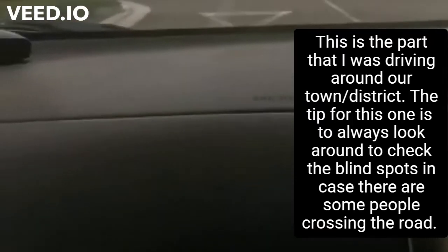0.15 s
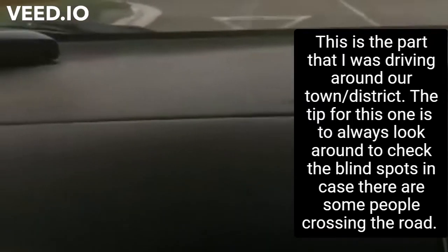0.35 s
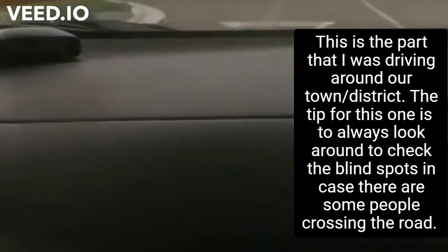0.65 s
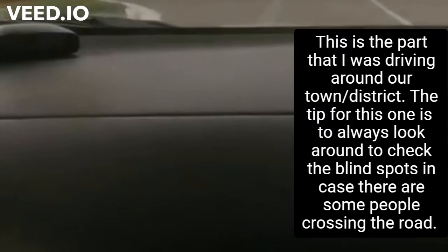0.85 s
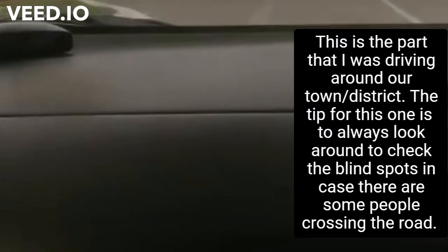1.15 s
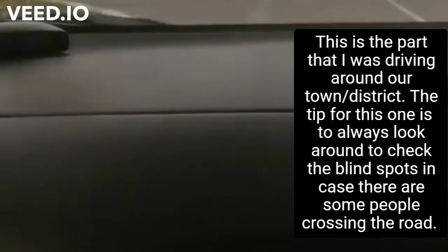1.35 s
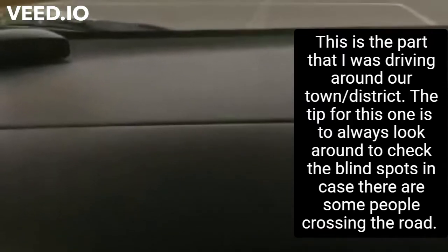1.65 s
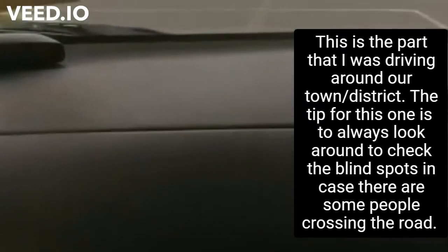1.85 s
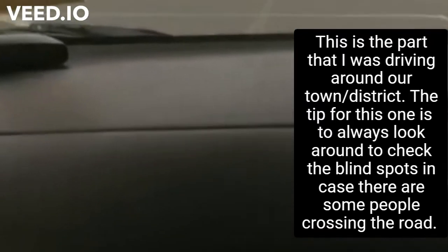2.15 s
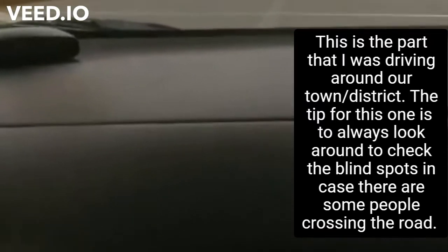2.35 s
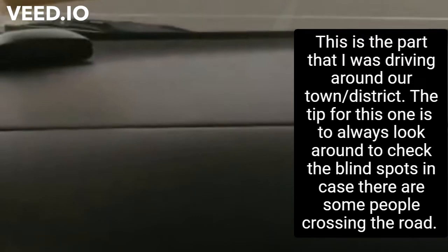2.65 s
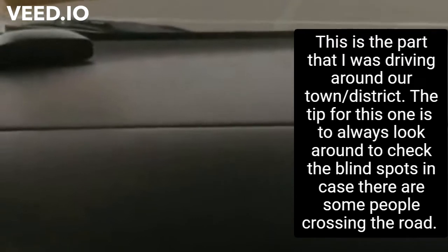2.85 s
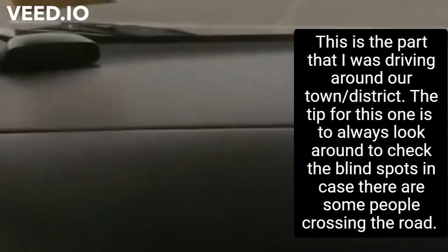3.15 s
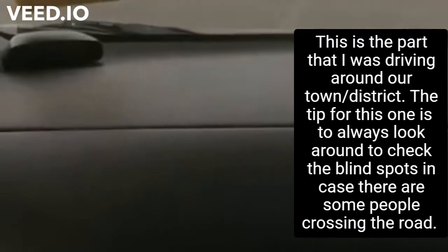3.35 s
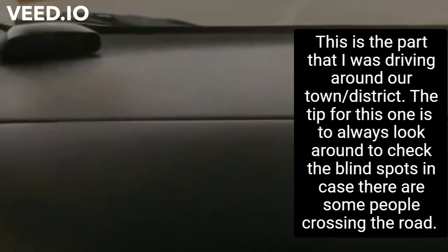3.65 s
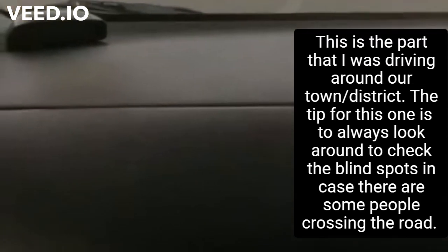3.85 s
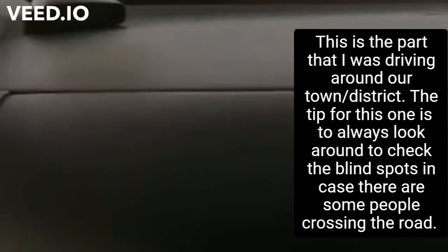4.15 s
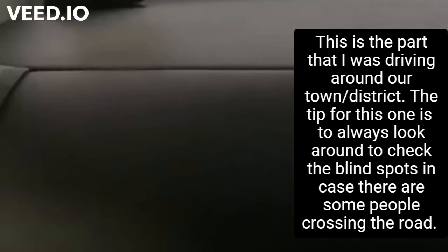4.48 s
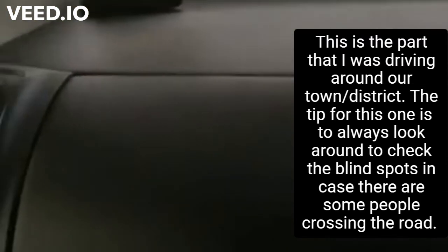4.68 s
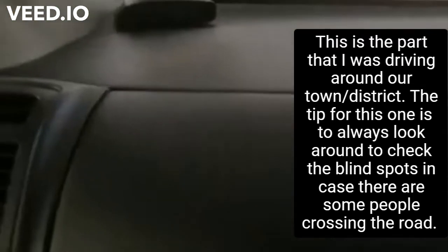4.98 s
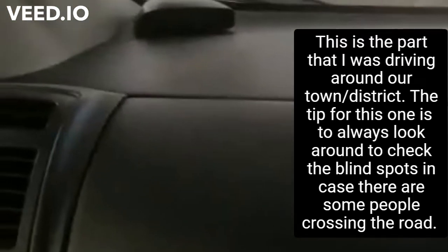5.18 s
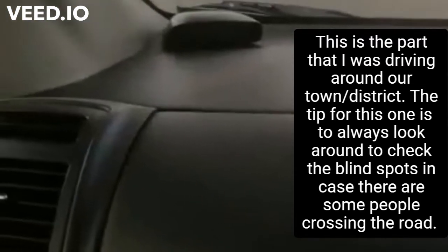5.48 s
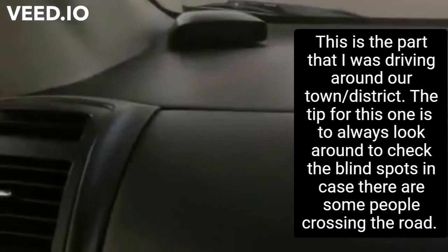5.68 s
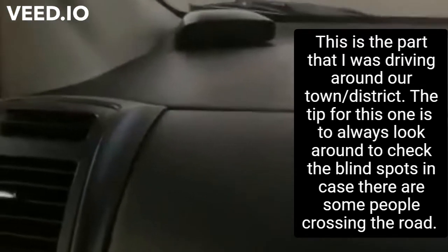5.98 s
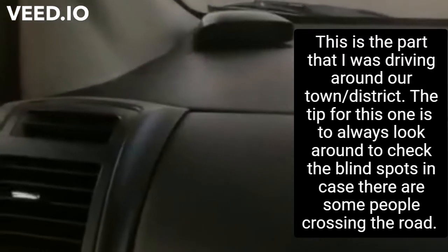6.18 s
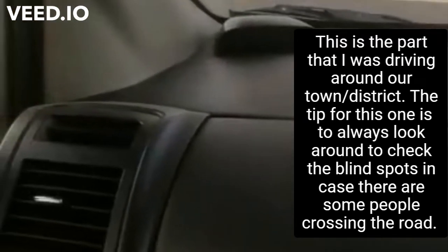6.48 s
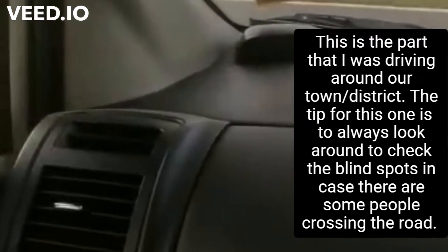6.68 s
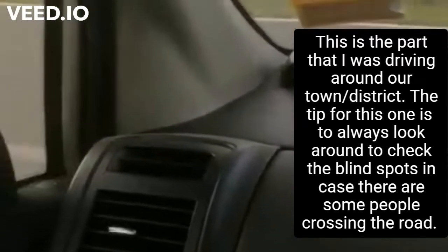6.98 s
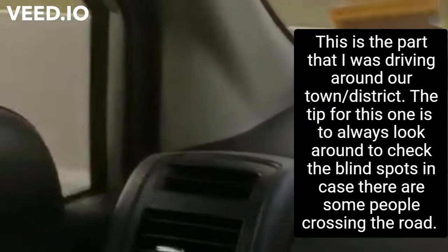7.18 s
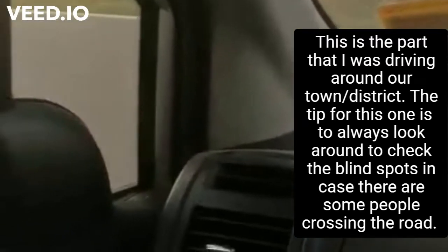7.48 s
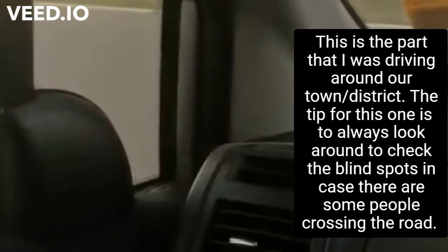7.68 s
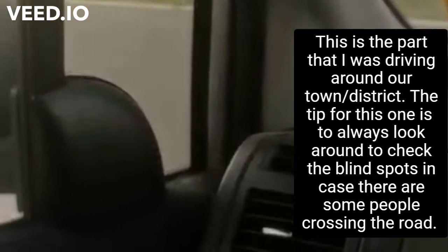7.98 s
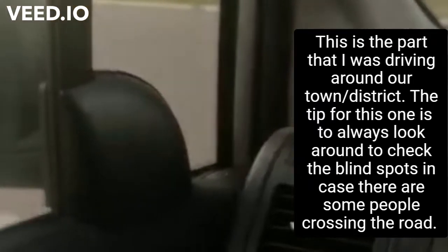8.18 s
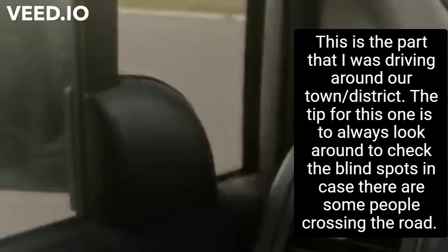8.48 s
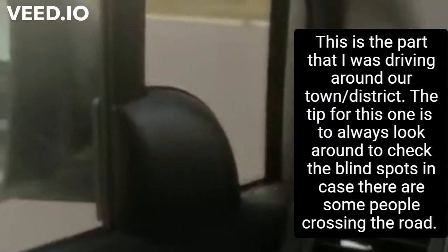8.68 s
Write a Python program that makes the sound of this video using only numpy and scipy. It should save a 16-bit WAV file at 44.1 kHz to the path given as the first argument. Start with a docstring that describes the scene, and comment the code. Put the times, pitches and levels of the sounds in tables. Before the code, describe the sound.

Close, padded car cabin heard through a handheld phone with dull treble. Bass-heavy bumps and shudders roll over low engine drone and soft road roar, stronger at first and then calmer. Small dry indicator ticks repeat almost three times a second, leaning right. Gritty skin rubbing, tiny case clicks and brief thin squeaks come and go; a double heavy thump precedes one bright plastic clack.

```python
"""Inside a small car rolling slowly round a corner: body boom, tyre roar and a low engine.
Shaped noise makes the ride; sine waves make the engine and the ticking turn signal.
Bumps thud through the cabin as ringing low tones; near the end a plastic lever snaps over.
A hand shifts on the phone: skin rubs by the right microphone as gritty noise,
and the case clicks (noise bursts) and squeaks (whistles mixed with noise)."""
import sys
import numpy as np
from scipy import signal
from scipy.fft import rfft, irfft, next_fast_len
from scipy.io import wavfile
from scipy.ndimage import uniform_filter1d, map_coordinates

SR = 44100
rng = np.random.default_rng(int(sys.argv[2]) if len(sys.argv) > 2 else 0)


def inscribe(sig):
    """Save sig as 16-bit PCM at rate SR to the path in sys.argv[1].

    A 1-D sig is mono; a 2-D sig holds one channel per row.
    Samples are clipped to [-1, 1] before scaling.
    """
    pcm = np.round(np.clip(np.atleast_2d(sig).T, -1, 1) * 32767)
    wavfile.write(sys.argv[1], SR, pcm.astype(np.int16))


N = 389403  # length [samples]
HISS_TOP_HZ = 7550  # most of the noises stop here

# how the cabin's noise leans to one side: (frequency [Hz], left over right [dB])
SIDE_LEAN = [(60, 5.9), (150, 5), (280, .5), (600, 0), (2000, -2), (7000, -1)]
# colour of the tyre roar, also of trim shaken by thuds: (frequency [Hz], relative level [dB])
ROAR_COLOUR = [(120, -19), (220, 6), (300, -1.5), (480, -1.5), (700, -13), (1100, -13), (1700, -23),
               (3000, -32.5), (7500, -38)]
# colour of the clicking phone case, also of the lever's chatter: (frequency [Hz], relative level [dB])
CASE_COLOUR = [(200, -16), (700, 4), (1400, 9), (2200, 10), (3400, 0.5), (5000, -2), (8000, -8)]


def amp(db):
    """Turn decibels into a gain."""
    return 10 ** (np.asarray(db) / 20)


def unit(x):
    """Scale a sound to an rms (average strength) of 1."""
    return x / np.sqrt(np.mean(x ** 2) + 1e-20)


def along(points, hz):
    """Read a curve of (frequency, value) points, spacing pitch as the ear does (log axis)."""
    f, v = np.transpose(points)
    return np.interp(np.log(hz + 1), np.log(f + 1), v)


def curves(rows):
    """Give one value per sample for each column after the time."""
    s, *columns = np.transpose(rows)
    return [np.interp(np.arange(N) / SR, s, column) for column in columns]


def wobble(rate):
    """Draw a smooth random curve with this many random points a second."""
    points = rng.standard_normal(int(N * rate / SR) + 4)
    return map_coordinates(points, [np.arange(N) * rate / SR])


def filtered(x, response):
    """Multiply the spectrum of x by a response that depends on frequency."""
    n = x.shape[-1]
    m = next_fast_len(n + SR // 4)
    spectrum = rfft(x, m) * response(np.fft.rfftfreq(m, 1 / SR))
    return irfft(spectrum, m)[..., :n]


def pan(db):
    """Left and right gains; positive decibels make the left louder."""
    return amp(np.array([db, -db]).reshape(2, -1) / 2)


def add(track, s, sound):
    """Mix a sound into the track at time s [s]."""
    part = track[:, round(s * SR):][:, :sound.shape[-1]]
    part += sound[..., :part.shape[-1]]


def patchy(x, depth_db):
    """Make a sound uneven with random gains in small patches of time and pitch."""
    z = signal.stft(x, nperseg=2048)[2]
    over_pitch = uniform_filter1d(rng.standard_normal(z.shape[1:]), size=5, axis=0)
    field = uniform_filter1d(over_pitch, size=4, axis=1)
    return signal.istft(z * amp(depth_db * unit(field)), nperseg=2048)[1][:, :N]


def swell(s, length, attack, release):
    """Rise from time s, hold until the length is over, then die away (all in seconds)."""
    t = np.arange(N) / SR - s
    return np.clip(t / attack, 0, 1) * np.exp(-np.maximum(t - length, 0) / release)


def cabin_noise(colour):
    """Noise whose bass both microphones share and whose treble they do not; its mid has rms 1."""
    # how alike left and right are: (frequency [Hz], likeness [0 unrelated to 1 the same])
    likeness = [(60, .96), (120, .94), (240, .88), (480, .7), (1000, .3), (2000, 0)]

    def mid_and_side(hz):
        angle = np.arccos(np.clip(along(likeness, hz), -1, 1)) / 2
        return amp(along(colour, hz)) * (hz < HISS_TOP_HZ) * [np.cos(angle), np.sin(angle)]

    mid, side = filtered(rng.standard_normal((2, N)), mid_and_side)
    pair = filtered(np.array([mid + side, mid - side]), lambda hz: pan(along(SIDE_LEAN, hz)))
    return pair / pair.mean(0).std()


def steadied(x, span):
    """Even out a noise's own slow swells, judged over a span [s]."""
    energy = np.abs(uniform_filter1d(x.mean(0) ** 2, int(span * SR)))
    return x / np.sqrt(energy + 1e-6)


def ride(smooth_db, bumps):
    """Strength of a body vibration: a wandering base, to which each bump adds its energy."""
    base = amp(smooth_db + 3 * wobble(8.5))
    energy = base ** 2
    for s, length, db in bumps:
        energy = energy + (amp(db) * swell(s, length, attack=.03, release=.043)) ** 2
    return np.sqrt(energy)


def road():
    """The body booms on its springs, the floor shudders, the tyres drum, the tarmac roars, air hisses."""
    # the tyres on the changing tarmac: (time [s], drum level [dB], roar level [dB])
    tyre_levels = [(0, -46.5, -59.5), (.9, -48, -60.5), (1.45, -49, -58.5), (2.3, -45, -59.5),
                   (3.0, -54, -62.5), (5.2, -54, -64), (6.6, -54, -64), (7.6, -51.5, -62),
                   (8.8, -52, -60.5)]
    # uneven patches that rock the body and shake the floor:
    # (time [s], length [s], boom level [dB], shudder level [dB])
    uneven_patches = [(-.05, 0.052, -20.5, -32), (0.268, 0.3, -30.5, -38.5), (0.592, 0.15, -30, -51),
                      (0.991, 0.12, -33, -55), (1.218, .08, -32.5, -49), (1.387, 0.13, -28, -39.5),
                      (1.86, 0.24, -32.5, -41), (2.086, 0.084, -22.5, -27), (2.212, 0.17, -26.5, -35.5),
                      (2.452, 0.13, -27.5, -29), (2.76, 0.097, -29.5, -43), (2.964, 0.14, -42.5, -40.5),
                      (3.336, 0.089, -29.5, -47), (3.679, .13, -24, -34.5), (4.33, .06, -30, -41),
                      (4.472, 0.039, -33, -35), (4.673, 0.24, -44, -40.5), (5.122, 0.19, -37.5, -40),
                      (5.389, 0.1, -26.5, -37), (5.54, 0.27, -28.5, -37.5), (5.866, .26, -26.5, -38),
                      (6.61, 0.13, -32.5, -34), (6.795, .1, -31.5, -39), (7.005, 0.058, -30, -32.5),
                      (7.141, .18, -33.5, -43), (7.599, 0.067, -22.5, -39), (7.77, 0.15, -34.5, -47.5),
                      (8.569, 0.66, -25.5, -55)]
    # colours of the body boom, floor shudder, tyre drumming and air: (frequency [Hz], relative level [dB])
    boom_colour = [(8, -26.5), (15, -13), (22, 18), (28, 20), (35, 22), (44, -17.5), (60, -67)]
    shudder_colour = [(30, -28.5), (43, -1), (52, 24), (62, -4.5), (74, 7.5), (90, -1), (125, -61.5)]
    drum_colour = [(60, -34), (92, 5), (115, -1), (170, -5), (210, -19), (300, -31), (600, -65)]
    air_colour = [(500, -12), (1100, -2.5), (1400, -6.5), (2300, 5), (2900, -3.5), (3500, -6.5), (5000, -6),
                  (7500, -14)]

    s, length, boom_db, shudder_db = np.transpose(uneven_patches)
    boom = ride(-37.5, zip(s, length, boom_db)) * steadied(cabin_noise(boom_colour), span=.049)
    shudder = ride(-45.5, zip(s, length, shudder_db)) * steadied(cabin_noise(shudder_colour), span=.11)

    drum_db, roar_db = curves(tyre_levels)
    surge_db = 2.25 * wobble(8.6)  # the drumming swells and sinks
    drum = amp(drum_db + surge_db) * cabin_noise(drum_colour)
    roar = patchy(cabin_noise(ROAR_COLOUR), depth_db=2.5)
    air = amp(-12.5) * patchy(cabin_noise(air_colour), depth_db=2)
    return boom + shudder + drum + amp(roar_db) * (roar + air)


def engine():
    """Low multiples of the firing rate, each a little unsteady; the revs sag in the corner and recover."""
    # (time [s], firing rate [Hz])
    firing_rates = [(0, 30.4), (1.25, 29.1), (2, 27.5), (6.9, 27.6), (7.25, 22.9), (8.3, 28.1),
                    (8.83, 29.1)]
    # (multiple of the firing rate, relative level [dB])
    orders = [(1, -1.5), (2, 5), (3, 1), (4, 1), (5, -9.5), (6, -13)]

    firing_hz, = curves(firing_rates)
    phase = 2 * np.pi * np.cumsum(firing_hz) / SR
    hum = np.zeros(N)
    for multiple, db in orders:
        strength = amp(db + 2.5 * wobble(2.0))
        hum += strength * np.sin(round(multiple) * phase + rng.uniform(0, 2 * np.pi))
    return amp(-56.5) * hum * pan(along(SIDE_LEAN, firing_hz))


def thuds():
    """Soft, heavy blows ring the cabin's low tones and briefly shake the trim."""
    # (time [s], level [dB], time to fade by 60 dB [s])
    blows = [(0.413, -19.5, 0.093), (0.481, -35.5, 0.25), (1.763, -35.5, 0.24), (2.257, -34.5, 0.092),
             (3.668, -32, 0.12), (3.711, -38.5, 0.16), (6.96, -34.5, 0.19), (6.995, -19, 0.13),
             (7.0112, -19, .13), (7.0182, -17.5, 0.15), (7.056, -33, 0.19), (7.1, -29, 0.18),
             (7.64, -41, 0.15)]
    # what the cabin booms with when struck: (frequency [Hz], relative level [dB])
    boom_tones = [(112, 0), (132, 1), (152, 0), (174, -5), (212, -15.5)]

    out, t = np.zeros((2, N)), np.arange(SR // 2) / SR
    onset = (1 - np.exp(-t / .0058)) ** 2
    for s, db, t60 in blows:
        ring = sum(amp(level + rng.normal(0, 1.2)) * np.sin(2 * np.pi * hz * t) for hz, level in boom_tones)
        noise = rng.standard_normal((2, len(t)))
        rattle = filtered(noise, lambda hz: amp(along(ROAR_COLOUR, hz)) * (hz < HISS_TOP_HZ))
        trim = amp(-21.5) * unit(rattle)
        add(out, s, amp(db) * (ring + trim) * onset * amp(-60 * t / t60))
    return out * pan(db=4.5)


def indicator():
    """Each tick is a rounded burst of a few milliseconds, echoed by windscreen and doors."""
    # the dashboard as the phone turns: (time [s], tick level [dB], left over right [dB])
    dashboard = [(0, -46.5, -11), (2.3, -47, -5), (2.97, -44, -5), (3.8, -47.5, -8.5), (4.5, -45.5, -10),
                 (5.1, -47, -3), (5.8, -48, -5), (6.45, -50, -6), (7.5, -49.5, -2), (8.6, -48, -4)]
    # the tones in one tick: (frequency [Hz], relative level [dB])
    tick_tones = [(2485, 0), (2400, -7), (2280, -12), (2660, -18), (2020, -16), (2980, -22), (4950, -30),
                  (5700, -28), (5950, -21)]
    # echoes: (delay [s], relative level [dB])
    wall_echoes = [(.0077, -8), (.0138, -12), (.0195, -18)]
    first_s, period_s = .1668, .35
    crest_s = .0043  # time from the start of a tick to its peak

    out, t = np.zeros((2, N)), np.arange(SR // 20) / SR
    shape = (t / crest_s * np.exp(1 - t / crest_s)) ** 3
    when, levels_db, leans_db = np.transpose(dashboard)
    for s in np.arange(first_s, N / SR, period_s):
        db, lean_db = np.interp(s, when, levels_db), np.interp(s, when, leans_db)
        # the direct path comes first, then the echoes
        for delay, path_db in [(.000068, .0014), *wall_echoes]:
            # longer paths vary more in phase [cycles]
            phases = rng.normal(0, .08 + 9 * delay, (len(tick_tones), 2, 1))
            burst = np.zeros((2, len(t)))
            for (hz, level), phase in zip(tick_tones, phases):
                strength = amp(level + rng.normal(0, 1.5))
                burst += strength * np.sin(2 * np.pi * (hz * (t + delay) + phase))
            add(out, s + delay, amp(db + path_db) * pan(lean_db) * shape * burst)
    return out


def lever():
    """A few contacts in quick succession, each a crack that rings its own part of the plastic."""
    # the lever slips over its catch: (time [s], level [dB], pitch of the contact [Hz])
    contacts = [(8.3195, -35, 1400), (8.3223, -21.5, 5100), (8.3232, -27, 2630), (8.3252, -19, 3470),
                (8.3265, -23, 1910), (8.3275, -39, 7000), (8.331, -41, 4600)]
    # how the plastic rings: (frequency [Hz], relative level [dB], time to fade by 60 dB [s])
    plastic_tones = [(1190, -10, .035), (1490, -13, .03), (1820, -9, .035), (1925, -7, .045),
                     (2040, -5, .05), (2180, -6, .05), (2490, 0, .026), (3250, -13, .025), (3480, -2, .021),
                     (3950, -12, .018), (4550, -13, .025), (5200, -2, .014), (6860, -9, .014)]

    out, t = np.zeros((2, N)), np.arange(SR // 6) / SR
    apart = np.array([[0], [.25]])  # cycles between the microphones
    for s, db, pitch_hz in contacts:
        def focus_db(hz):
            # tones are driven less, per octave away from the contact's own pitch
            return -9.5 * np.abs(np.log2((hz + 1) / pitch_hz))

        ring = np.zeros((2, len(t)))
        for hz, level, t60 in plastic_tones:
            strength = amp(level + focus_db(hz) - 60 * t / t60)
            ring += strength * np.sin(2 * np.pi * (hz * t + rng.random() + apart))
        crack = unit(filtered(rng.standard_normal((2, len(t))), lambda hz: amp(focus_db(hz))))
        crack = amp(-14.5 - 60 * t / .036) * crack
        # the loose parts chatter on after the blow
        noise = rng.standard_normal((2, len(t)))
        chatter = unit(filtered(noise, lambda hz: amp(along(CASE_COLOUR, hz)) * (hz < HISS_TOP_HZ)))
        chatter = amp(-15 - 60 * t / .11) * chatter
        add(out, s, amp(db) * (ring + crack + chatter) * (1 - np.exp(-t / .00059)))
    # take away the bass
    return filtered(out, lambda hz: 1 - 1 / (1 + (hz / 1060) ** 12)) * pan(db=-4.5)


def clicks():
    """Dry ticks and short scuffs of the phone case: bursts of noise that die away."""
    # (time [s], level [dB], time to fade by 60 dB [s], left over right [dB], treble tilt [dB per octave])
    case_clicks = [(0.41, -57, 0.08, -24, -1), (1.625, -47, 0.014, -21.5, 0), (3.097, -42, 0.014, -19, 1.5),
                   (6.329, -57, 0.066, -15, -5), (6.412, -57.5, 0.017, -10, 3),
                   (7.0115, -41.5, 0.077, -4.5, 2.5)]

    out, t = np.zeros((2, N)), np.arange(SR // 6) / SR
    for s, db, t60, lean_db, tilt_db in case_clicks:
        def colour(hz):
            return amp(along(CASE_COLOUR, hz) + tilt_db * np.log2((hz + 200) / 2500))

        crack = unit(filtered(rng.standard_normal((2, len(t))), colour))
        add(out, s, amp(db) * pan(lean_db) * crack * amp(-60 * t / t60))
    return out


def squeaks():
    """A finger sticks and slips on the case: a brief whistle, from thin and clean to ragged."""
    # (time [s], length [s], pitch [Hz], glide of the tone [Hz], width of the scrape [Hz],
    #  roughness [0 clean, 1 or more fully ragged], level [dB], left over right [dB])
    finger_slips = [(0.646, 0.054, 4230, 76, 201, 0.2, -62, 9), (0.687, 0.034, 4900, 298, 1210, 1, -65, -1),
                    (1.026, 0.048, 7120, 0, 600, 0.94, -45, -7.5),
                    (1.033, 0.031, 5130, 0, 1500, 1.1, -53.5, -4),
                    (1.096, 0.043, 4190, -100, 800, 0.97, -56.5, -3),
                    (4.559, 0.044, 5100, 0, 1800, 1.1, -64, -4), (.394, .03, 5050, 0, 900, 1.1, -60.5, -4),
                    (6.954, 0.053, 4740, 0, 700, 1.2, -56.5, -6),
                    (7.009, .014, 4860, 0, 403, .35, -47.5, -2)]

    out = np.zeros((2, N))
    for s, length, centre_hz, glide_hz, width_hz, rough, db, lean_db in finger_slips:
        n, rough = int(length * SR), np.clip(rough, 0, 1)
        tone_hz = centre_hz + glide_hz * np.linspace(-.5, .5, n)
        tone = np.sin(2 * np.pi * np.cumsum(tone_hz) / SR)
        noise = rng.standard_normal((2, SR // 8))
        scrape = filtered(noise, lambda hz: 1 / (1 + (2 * (hz - centre_hz) / width_hz) ** 2))[:, :n]
        slips = amp(1.8 * rough * wobble(350)[:n])
        whistle = unit(slips * (np.sqrt(1 - rough) * unit(tone) + np.sqrt(rough) * unit(scrape)))
        add(out, s, amp(db) * pan(lean_db) * signal.windows.tukey(n, .6) * whistle)
    return out


def rubbing():
    """Skin slides by the right microphone in strokes: fine, slightly gritty friction noise."""
    # strokes of the hand: (time [s], length [s], level [dB])
    strokes = [(-.04, 0.048, -52.5), (0.191, 0.28, -66), (0.293, .11, -65.5), (0.6, .1, -67.5),
               (0.952, 0.22, -71.5), (1.299, 0.1, -62), (1.462, .064, -64.5), (1.62, 0.1, -71.5),
               (1.932, 0.22, -63), (2.272, 0.21, -63.5), (2.68, 0.22, -77), (2.935, 0.26, -60.5),
               (4.24, .16, -69), (4.473, 0.14, -66), (4.604, 0.2, -70), (4.958, .39, -71.5),
               (5.506, 0.4, -64), (6.58, 0.54, -67.5), (6.94, 0.53, -67), (7.439, 0.56, -60.5),
               (7.97, 0.39, -66), (8.379, 0.15, -60.5), (8.504, 0.36, -63)]
    # colour of the skin's hiss: (frequency [Hz], relative level [dB])
    skin_colour = [(300, -5), (750, -10), (1200, -11), (1700, -7), (2000, -2), (2500, -2.5), (2950, -6.5),
                   (3300, -14), (3700, -13.5), (4400, -11), (5300, -8), (6300, -12.5), (7500, -13)]

    slide = amp(-77)  # the hand at rest
    for s, length, db in strokes:
        slide = slide + amp(db) * swell(s, length, attack=.07, release=.016)
    grit = amp(2 * wobble(12) + 1.4 * wobble(520))  # slow catches and fine grit
    friction = grit * patchy(rng.standard_normal((2, N)), depth_db=2)
    hiss = unit(filtered(friction, lambda hz: amp(along(skin_colour, hz)) * (hz < HISS_TOP_HZ)))
    return slide * hiss * pan(db=-9.5)


def cabin(x):
    """The short blurred echo of an upholstered cabin: noise that fades at its own speed at each pitch."""
    # (frequency [Hz], time to fade by 60 dB [s])
    fade_times = [(200, 0.067), (2500, 0.11), (8000, 0.016)]

    hz, t, z = signal.stft(rng.standard_normal((2, SR // 4)), SR, nperseg=256)
    fade = amp(-60 * t / along(fade_times, hz)[:, None])
    tail = signal.istft(z * fade, SR, nperseg=256)[1]
    return signal.fftconvolve(x, tail / np.linalg.norm(tail[0]), axes=1)[:, :N]


def scene():
    """Mix the car, its small sounds in the cabin, and the hand on the phone."""
    ticks, snap = indicator(), lever()
    echo = cabin(amp(-10.5) * ticks + amp(-21.0) * snap)
    car = road() + engine() + thuds()
    hand = clicks() + squeaks() + rubbing()
    return car + ticks + snap + echo + hand


def record(dry):
    """The phone keeps nothing above 8600 Hz; the treble fades out over the last 400 Hz below it."""
    return filtered(dry, lambda hz: np.clip((8600 - hz) / 400, 0, 1))


dry = scene()
out = record(dry)
inscribe(out)
```